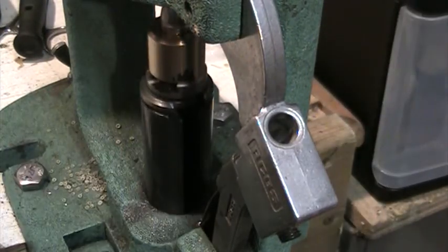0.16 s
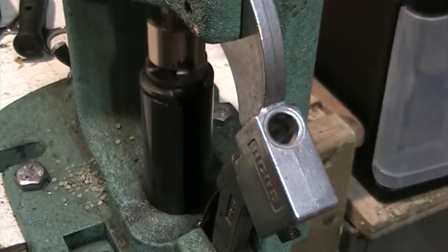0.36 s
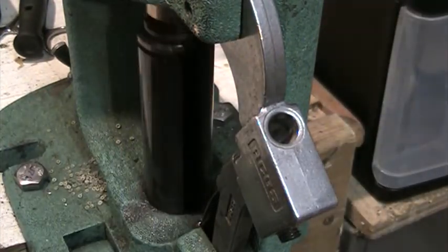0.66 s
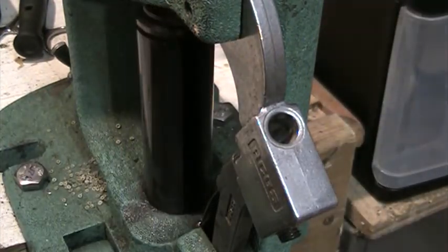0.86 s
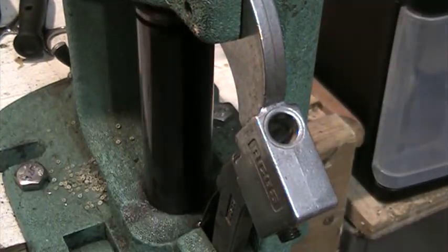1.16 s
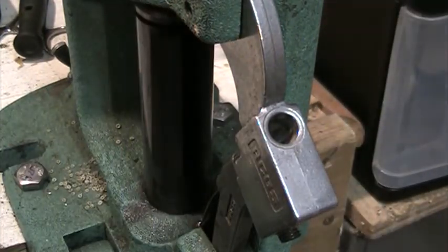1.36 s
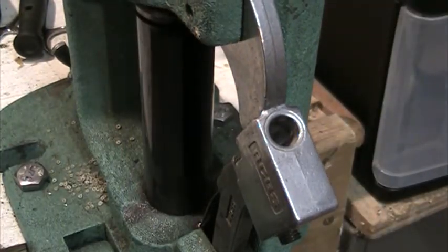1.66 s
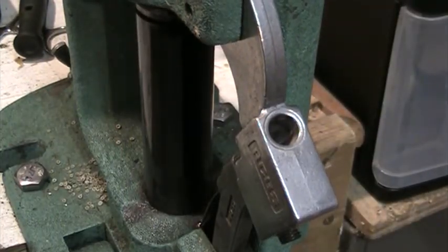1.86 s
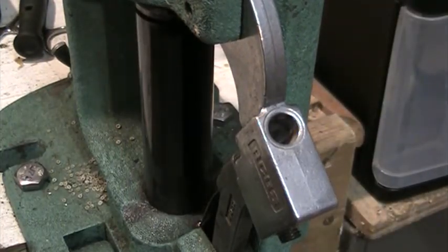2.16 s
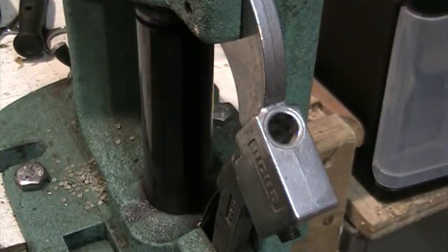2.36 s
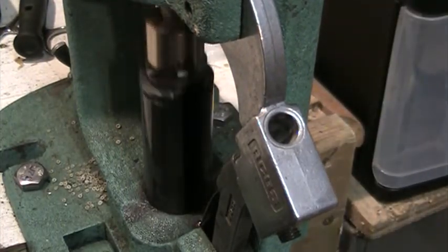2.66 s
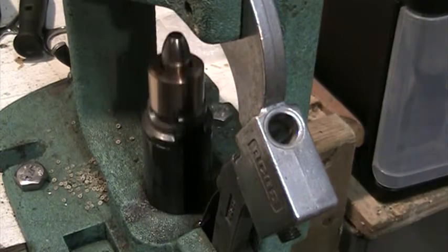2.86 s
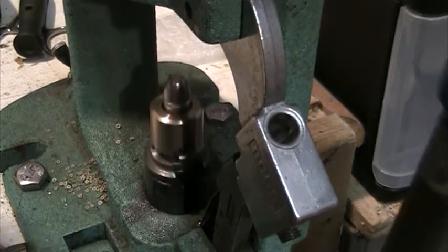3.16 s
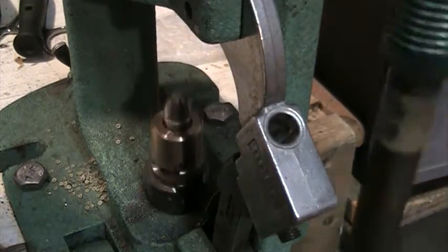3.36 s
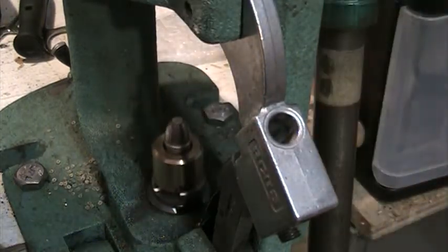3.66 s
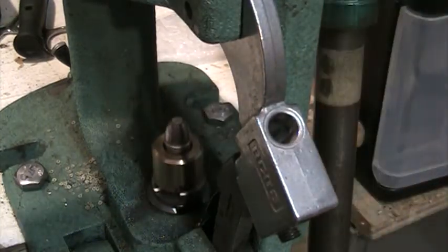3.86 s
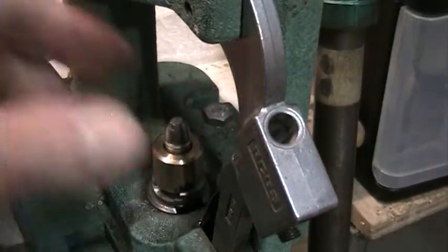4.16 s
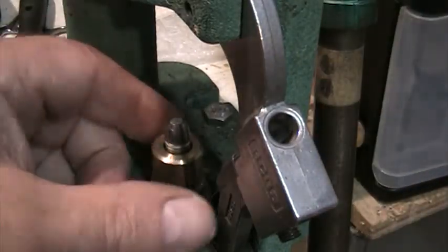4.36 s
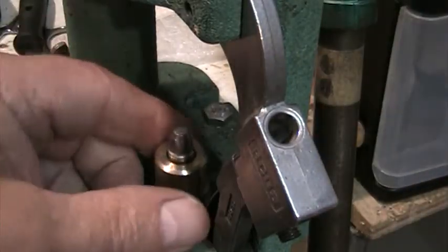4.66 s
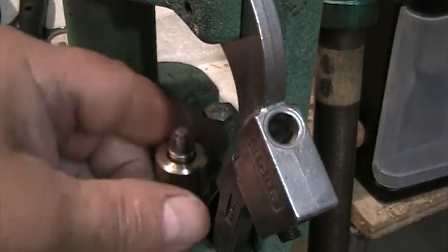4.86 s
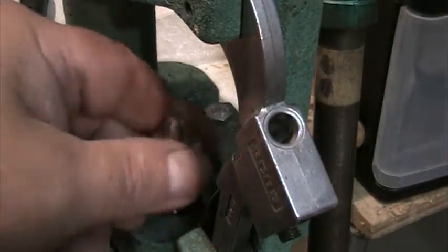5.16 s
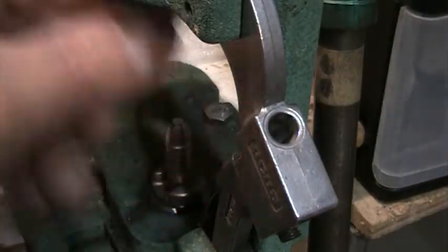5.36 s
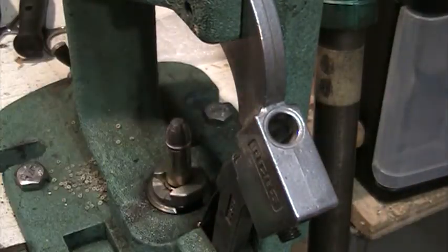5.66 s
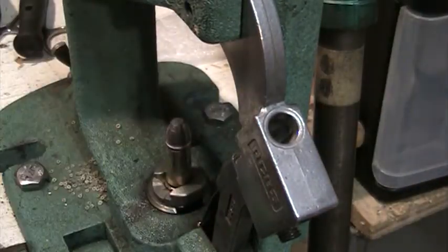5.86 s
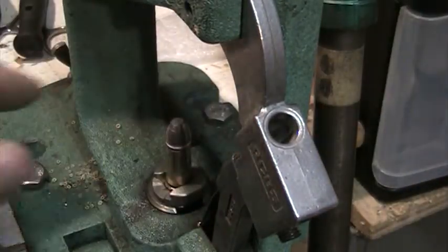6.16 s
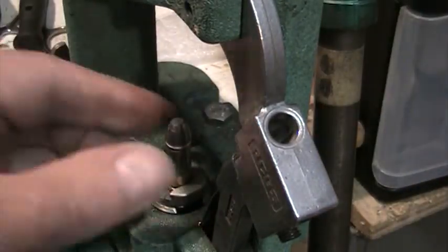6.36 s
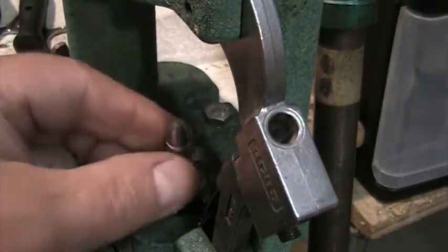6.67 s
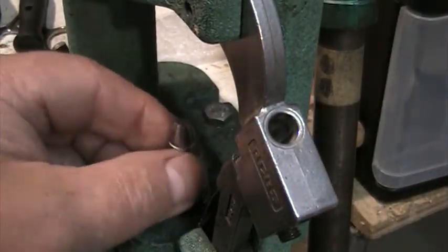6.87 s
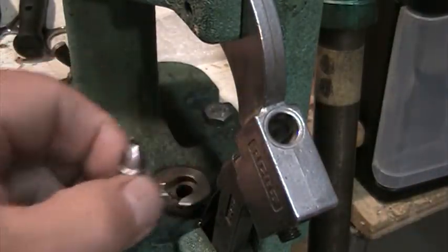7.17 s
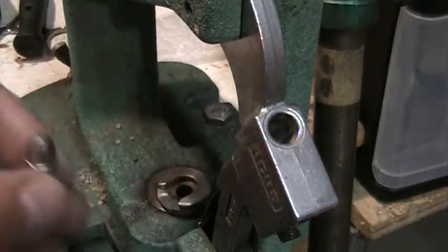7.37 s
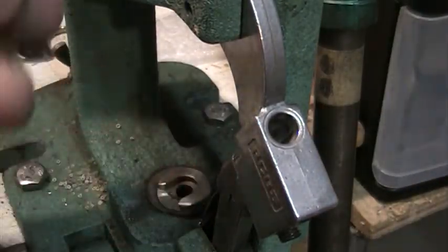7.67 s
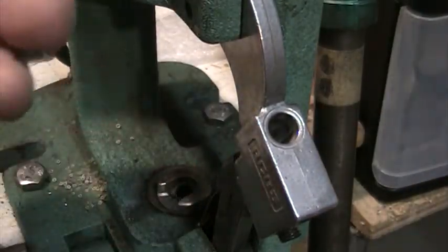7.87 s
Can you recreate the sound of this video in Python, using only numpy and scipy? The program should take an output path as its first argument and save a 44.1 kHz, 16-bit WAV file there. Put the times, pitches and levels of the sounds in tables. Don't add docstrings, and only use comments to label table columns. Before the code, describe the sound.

A close stereo pickup in a quiet small workshop: soft air hiss, low hum, and a faint rapid mechanical ticking from a camera lens motor throughout. A light rub fades by 0.3 s. Small clacks and soft knocks come at 0.8 and 1.0-1.2 s, then a loud, deep iron clunk at 1.8 s with a short scrape. From 2.27 to 2.45 s a bright, rattling burst of clacks breaks free, followed by smooth sliding. Duller knocks fall at 3.1 s, and a heavy double thud at 3.6 s shakes the bench. Between 4.4 and 5.4 s fingers work a steel die loose: crisp clicks, small scrapes, a sharp snap near 5.07. Clicks at 5.7-5.8 lead to clustered hollow knocks around 5.9-6.0 s as it settles in a tray. Light brass touches from 6.5 s end in a bright, short tink at 7.03 s, then a faint scrape and near quiet.

```python
import sys
import numpy as np
from scipy import signal
from scipy.fft import rfft, irfft, next_fast_len
from scipy.io import wavfile
from scipy.ndimage import map_coordinates

SR = 44100
rng = np.random.default_rng(int(sys.argv[2]) if len(sys.argv) > 2 else 0)


def int16_out(signal):
    q = np.round(np.clip(np.atleast_2d(signal).T, -1, 1) * 32767)
    wavfile.write(sys.argv[1], SR, q.astype(np.int16))


def level_to_linear(level):
    exponent = np.asarray(level, float) / 20
    return 10 ** exponent


N = 352800


def unit(x):
    return x / np.sqrt(np.mean(x ** 2) + 1e-20)


def peaked(x):
    return x / np.abs(x).max()


def along(points, hz):
    f, v = np.transpose(points)
    return np.interp(np.log(hz + 1), np.log(f + 1), v)


def filtered(x, response):
    m = next_fast_len(N + SR // 2)
    return irfft(rfft(x, m) * response(np.fft.rfftfreq(m, 1 / SR)), m)[..., :N]


def resonated(x, hz, q):
    return signal.lfilter(*signal.iirpeak(hz, q, SR), x)


def rush(spectrum, alike, source):
    def mid_side_response(hz):
        turn = np.arccos(np.clip(along(alike, hz), -1, 1)) / 2
        return level_to_linear(along(spectrum, hz)) * [np.cos(turn), np.sin(turn)]

    mid, side = filtered(source, mid_side_response)
    return unit(np.array([mid + side, mid - side]))


def add(track, s, sound, pan_db=0):
    part = track[:, round(s * SR):][:, :sound.shape[-1]]
    part += level_to_linear([[pan_db / 2], [-pan_db / 2]]) * sound[..., :part.shape[1]]


def ring(modes, t, scatter_db, attack_s):
    hz, db, t60 = np.transpose(modes)[:, :, None]
    strength, detune = rng.standard_normal((2, len(modes), 1))
    decay = level_to_linear(db + scatter_db * strength - 60 * t / t60)
    waves = decay * np.sin(2 * np.pi * hz * (1 + 0.016 * detune) * t)
    return peaked(waves.sum(0) * (1 - np.exp(-t / attack_s)))


def struck(modes, t, contact_t60, gritty):
    drive = gritty * level_to_linear(-60 * t[:900] / contact_t60) * rng.standard_normal(900)
    drive[0] = 1
    return peaked(signal.fftconvolve(ring(modes, t, 3.9, 0.0011), drive)[:len(t)])


def contacts(rows, body, click_t60, click_db, edge_db, body_db, dense_db, pan_db):
    out, t = np.zeros((2, N)), np.arange(SR // 9) / SR
    heavy_hz, heavy_db, lighter_db_per_octave, sharp_loss = 2700, 2, 4.6, 0.18
    dense = signal.butter(2, [600, 2600], "band", fs=SR)
    for s, db, sharpness_db, hz in rows:
        sharp_db = db + sharpness_db
        ring_db = db + heavy_db - lighter_db_per_octave * np.log2(hz / heavy_hz) - sharp_loss * sharpness_db

        rattle = level_to_linear([[-20], [-30], [-26], [-12]] - 60 * t / 0.15)
        burst = (level_to_linear(-60 * t / click_t60) + rattle) * rng.standard_normal((4, len(t)))
        burst[:, 0] += 3

        top_hz = max(8027 + 200 * min(sharpness_db, 0), 3800)
        dull = signal.butter(2, [2300, top_hz], "band", fs=SR)
        air = signal.butter(2, min(1.84 * top_hz, 16000), fs=SR)
        crack = level_to_linear(db + click_db) * peaked(signal.lfilter(*air, signal.lfilter(*dull, burst[0])))

        edge_hz = np.clip(max(1.1 * hz, 10501 + 420 * sharpness_db), 9500, 17000)
        sharp = signal.butter(2, [7000, edge_hz], "band", fs=SR)
        edge = level_to_linear(sharp_db + edge_db) * peaked(signal.lfilter(*sharp, burst[1:3]))
        small_part_db = (db if hz < 7000 else sharp_db) - 0.5
        small_part = level_to_linear(small_part_db) * peaked(resonated(burst[2], hz, 14))

        hardness_db = np.clip(db - ring_db, -20, 8)
        modes = [(f, mode_db + 0.39 * hardness_db * np.log2(f / 1300), t60) for f, mode_db, t60 in body]
        body_sound = struck(modes, t, 0.03, 0.07)
        body_sound += level_to_linear(dense_db) * peaked(signal.lfilter(*dense, burst[3]))

        add(out, s, crack + level_to_linear(ring_db + body_db) * body_sound, pan_db)
        add(out, s, edge[0] + small_part, pan_db if hz < 5000 else -2)
        add(out, s, 0.51 * edge[1] * [[1], [-1]])
    return out


def press():
    # start in seconds, strength in dB, sharpness in dB, pitch of the striking part in Hz.
    rise = [(0.7944, -45.5, -22, 2650), (0.8038, -47.5, -5, 2600), (1.0111, -34, -2, 3500),
            (1.0702, -51, -25, 2800), (1.1206, -32, -8, 2540), (1.1539, -36, -6, 3450),
            (1.778, -41, -3, 3500), (1.7865, -20, -17, 2260), (1.8068, -40, -2, 2680),
            (1.8215, -44, 6, 11500), (1.8427, -37, -11, 2720), (1.8509, -46, -2, 3520),
            (1.8893, -45.5, -13, 4770)]
    release = [(2.0217, -47.5, -17, 5700), (2.2275, -56, 10, 5940), (2.2687, -47, -16, 2880),
               (2.281, -35, -7, 7600), (2.2881, -20, -2, 2630), (2.3101, -36, -4, 2570),
               (2.3457, -31, 0, 5200), (2.35, -22, 3, 15600), (2.3553, -16.5, -7, 11800),
               (2.3971, -26.5, 4, 8300), (2.422, -28, 3, 7100), (2.4283, -23.5, 2, 7000),
               (2.4398, -31, 4, 3000), (2.4504, -26.5, -1, 11000), (2.5373, -49, -87, 3060)]
    fall = [(3.0807, -49, 2, 3020), (3.0873, -48, -15, 3370), (3.1038, -51, -27, 2670),
            (3.1208, -40, -17, 1350), (3.152, -49, -22, 3600), (3.5026, -46, -11, 2680),
            (3.51, -43.5, -19, 2620), (3.525, -50, -30, 2710), (3.5789, -43, -28, 2610),
            (3.588, -24.5, -16, 3300), (3.5958, -31, -0.5, 3240), (3.6167, -32, -6, 2490),
            (3.6248, -43, 4.5, 11300), (3.8957, -55.5, -40, 2950)]
    # frequency in Hz, level in dB, t60 in seconds.
    frame = [(1073, 5.5, 0.0044), (1176, -11.5, 0.033), (1460, -1.5, 0.0067), (1558, -8.5, 0.024),
             (1960, 9.5, 0.005), (2196, -7, 0.023), (2630, -4.5, 0.014), (3230, -5.5, 0.018)]
    out = np.zeros((2, N))
    for rows, click_t60 in [(rise, 0.021), (release, 0.011), (fall, 0.021)]:
        out += contacts(rows, frame, click_t60, click_db=2.5, edge_db=0.5, body_db=0, dense_db=-2, pan_db=3)
    return out


def guide():
    # frequency in Hz, sharpness as Q, level in dB.
    resonances = [(512, 20, -65.5), (1200, 13, -68), (1460, 11, -64)]
    end_s = 0.33
    fade = np.clip(1 - (np.arange(N) / SR / end_s) ** 3, 0, 1)
    return fade * sum(level_to_linear(db) * unit(resonated(rng.standard_normal(N), hz, q)) for hz, q, db in resonances)


def thuds():
    # start in seconds, peak in dB, main frequency in Hz, bench share in dB.
    beats = [(1.02, -44, 500, -0.5), (1.206, -42, 203, -3), (1.474, -46, 322, -8), (1.7745, -28.5, 715, 3),
             (1.788, -12, 290, -3), (1.82, -44, 245, 1), (1.84, -28, 250, -2.5), (2.236, -45, 200, 11),
             (2.279, -25, 584, -5), (2.284, -19, 165, -27), (2.293, -21.5, 180, -1), (2.35, -31.5, 298, 2),
             (2.418, -35, 189, 2), (2.547, -36, 172, -27), (2.76, -43, 192, -9), (3.073, -41.5, 129, 15),
             (3.1204, -26, 640, 2.5), (3.1211, -31.5, 1370, 1), (3.148, -26, 150, -24),
             (3.176, -43, 264, -13), (3.511, -41, 437, -10), (3.583, -22, 364, -4), (3.59, -18.5, 429, -2),
             (3.601, -26.5, 152, -2.5), (3.616, -26, 390, 1), (3.621, -19, 497, -32),
             (3.629, -25, 513, -30)]
    # start in seconds, peak in dB, main frequency in Hz.
    seats = [(1.121, -42, 465), (4.447, -38.5, 533), (4.582, -32, 530), (4.732, -28.5, 524),
             (5.071, -46, 500), (5.093, -31, 530), (5.2, -45.5, 523), (5.408, -44, 410),
             (6.506, -45.5, 526), (6.656, -46, 550), (6.864, -51, 330), (7.027, -47, 720)]
    # frequency in Hz, level in dB, t60 in seconds.
    base = [(290, 8.5, 0.024), (419.7, 5, 0.042), (499, 9, 0.041), (640, 9, 0.031)]
    bench = [(52, -13.5, 0.43), (129, -0.5, 0.16), (172, 10.5, 0.062), (290, -20.5, 0.91)]
    # frequency in Hz, density in dB per Hz.
    boom = [(18, -42), (42, -4), (285, 2), (388, -4), (1040, -13.5), (4000, -52), (5200, -64), (8800, -120)]
    out, shocks, t = np.zeros((2, N)), np.zeros(N), np.arange(SR // 4) / SR
    small = signal.butter(2, 150, "high", fs=SR)
    blows = list(beats)
    rock_s, rock_db, seat_deep_db = 0.016, -3.5, -18
    for s, db, hz in seats:
        blows += [(s, db, hz, seat_deep_db), (s + rock_s, db + rock_db, hz, seat_deep_db)]
    for s, db, hz, deep_db in blows:
        modes = [(f, mode_db - 9 * abs(np.log2(f / hz)), t60) for f, mode_db, t60 in base]
        modes.append((hz, 5, 0.04))
        knock = level_to_linear(db + 1.5) * signal.lfilter(*small, struck(modes, t, 0.013, 0.18))
        deep = level_to_linear(db + deep_db - 6.5) * ring(bench, t, 2.75, 0.0066)
        add(out, s, knock + deep, 0.8)
        shocks[round(s * SR)] = level_to_linear(2 * (db + deep_db - 19.5))
    fade_t = np.arange(SR) / SR
    fade = level_to_linear(-2 * 60 * fade_t / 0.93) * (1 - np.exp(-fade_t / 0.0036))
    shaking = np.sqrt(np.abs(signal.fftconvolve(shocks, fade)[:N]))
    return out + shaking * rush(boom, [(350, 1), (3000, 0.93)], rng.standard_normal((2, N)))


def steel_die():
    # start in seconds, strength in dB, sharpness in dB, pitch of the striking part in Hz.
    touches = [(4.4141, -45.5, -1, 14200), (4.4431, -39, 18, 3150), (4.4942, -43, 4, 7200),
               (4.54, -35.5, 9, 15300), (4.5823, -38, 16, 2650), (4.5921, -44.5, -3, 3420),
               (4.6384, -49, -14, 3450), (4.6685, -38.5, -2.5, 6940), (4.7317, -29, 15, 2640),
               (4.7601, -40, 2, 3570), (4.7798, -50.5, -39, 3340), (5.0442, -50, 5, 8000),
               (5.0673, -29.5, 5, 8430), (5.0893, -44, -21, 2700), (5.0935, -54, -25, 990),
               (5.1646, -38, 7, 5630), (5.2275, -50, -3, 3100), (5.2116, -46, 1, 3750),
               (5.2162, -42, -6, 3200), (5.3788, -44.5, 5, 3480), (5.4072, -46, -1, 3600),
               (5.4205, -49, 17, 3550), (5.6824, -30.5, -1, 6700), (5.6845, -43, -25, 1320),
               (5.7829, -35.5, -2, 6840)]
    # frequency in Hz, level in dB, t60 in seconds.
    collar = [(680, -7.5, 0.06), (957, -9, 0.1), (1098, 8, 0.03), (1448, 1.5, 0.076), (2050, 0, 0.044),
              (3200, 2.5, 0.035)]
    return contacts(touches, collar, click_t60=0.0085, click_db=8, edge_db=-8, body_db=0, dense_db=3, pan_db=2.5)


def tray():
    # start in seconds, strength in dB, sharpness in dB, pitch of the striking part in Hz.
    touches = [
        (5.9215, -39.5, -47, 2550),
        (5.9294, -38.5, -67, 2400),
        (5.9605, -33.5, -45, 2600),
        (5.9635, -28, -25, 2700),
        (5.991, -25, -31, 2500),
        (6.012, -45, -21, 2800),
    ]
    # start in seconds, peak in dB.
    flat_knocks = [(5.685, -37.5), (5.787, -39.5), (5.928, -29), (5.965, -31.5), (5.993, -33),
                   (6.014, -34.5)]
    # frequency in Hz, level in dB, t60 in seconds.
    shelf = [(759, -18, 0.16), (1015, -17, 0.19), (1307, -2.5, 0.11), (1353, 6, 0.06), (1423, -11, 0.093),
             (1510, -10, 0.056), (1795, 9, 0.024), (2010, 7.5, 0.026), (2320, -10, 0.017),
             (3150, 8, 0.0097), (3350, -8, 0.02)]
    hollow_floor = [(357, 4, 0.04)]
    out = contacts(touches, shelf, click_t60=0.021, click_db=3, edge_db=-5, body_db=2.5, dense_db=-4, pan_db=3)
    for s, db in flat_knocks:
        add(out, s, level_to_linear(db) * ring(hollow_floor, np.arange(SR // 8) / SR, 0, 0.0024), 2.5)
    return out


def brass_case():
    # start in seconds, strength in dB, sharpness in dB, pitch of the striking part in Hz.
    touches = [(6.5001, -35.5, 0.5, 7950), (6.5051, -32.5, 2, 3160), (6.5596, -41, -3, 6000),
               (6.6488, -35.5, -1, 12200), (6.654, -30.5, -2.5, 6100), (6.692, -47, 4.5, 7440),
               (6.745, -48.5, -17, 3220), (6.7791, -55, -45, 4360), (6.9201, -54.5, -15, 2860),
               (6.9635, -52.5, -34, 2960), (7.0264, -21, -11, 6440), (6.6416, -44, -9, 2940),
               (7.0715, -39, -7, 5830)]
    # frequency in Hz, level in dB, t60 in seconds.
    brass = [(1067, 1, 0.025), (1480, 1, 0.02), (1951, 1, 0.05), (2800, 7, 0.019), (3300, 10.5, 0.014)]
    chime = [(5600, -17, 0.024), (6150, 2, 0.011), (6500, -25, 0.0525), (7670, 2, 0.0074),
             (8300, -23, 0.012)]
    out = contacts(touches, brass, click_t60=0.0094, click_db=2, edge_db=5.5, body_db=-2, dense_db=0, pan_db=2.5)
    s, db = max(touches, key=lambda row: row[1])[:2]
    add(out, s, level_to_linear(db + 11.5) * ring(chime, np.arange(SR // 8) / SR, 0.74, 0.00027), 0.3)
    return out


def singing_parts():
    # start in seconds, peak in dB,
    # frequency in Hz, t60 in seconds.
    part_notes = [(0.7958, -43.5, 2450, .04), (0.803, -41, 2720, 0.035), (0.913, -47.5, 3050, .025),
                  (1.012, -29.5, 2590, 0.025), (1.069, -48, 2500, .03), (1.136, -48, 900, 0.028),
                  (1.845, -40, 1200, 0.042), (1.891, -40.5, 1500, .04), (1.904, -45, 1100, .03),
                  (2.443, -32, 2300, 0.018), (3.091, -43, 2450, 0.032), (3.105, -42, 2500, 0.04),
                  (4.416, -49, 1450, .05), (4.432, -46, 2800, .015), (4.443, -34.5, 1040, .02),
                  (4.456, -51, 1460, .08), (4.583, -42, 786, .03), (4.636, -52, 1460, .08),
                  (4.732, -28, 826, 0.015), (4.734, -46, 2660, 0.018), (4.746, -47, 3150, .05),
                  (5.151, -48, 2500, .02), (5.178, -48, 2220, 0.06), (5.214, -39, 1050, .025),
                  (5.682, -30.5, 1300, 0.02), (5.695, -50.5, 974, 0.4), (5.783, -37, 1200, .03),
                  (5.79, -54, 944, 0.11), (5.862, -52, 1100, .03), (6.552, -45, 1430, 0.035),
                  (6.552, -49, 2190, .03), (6.594, -51, 1450, .03), (6.642, -38.5, 1470, 0.046),
                  (6.748, -49, 1450, .03), (6.779, -45.5, 1440, 0.035), (6.921, -43.5, 1430, 0.023),
                  (6.964, -45, 2120, 0.04), (7.032, -37, 1960, 0.089), (7.034, -46, 1440, 0.12)]
    more_part_notes = [(1.787, -18.5, 784, .02), (1.8, -24, 330, 0.02), (1.906, -51, 2870, .03),
                       (2.3556, -25, 2250, .018), (2.4, -33, 2310, 0.035), (2.452, -38, 2550, .03),
                       (3.1205, -37, 3930, .01), (3.152, -40, 1340, .04), (3.174, -48, 2450, .02),
                       (3.1, -36.5, 646, 0.062), (3.618, -30, 920, 0.015), (5.0915, -32, 540, 0.05),
                       (5.682, -39, 7100, 0.025), (5.685, -41, 3450, 0.027), (5.684, -51, 15400, .05),
                       (5.783, -33, 6980, 0.016), (5.785, -54, 15300, .04), (5.96, -28, 1840, .02),
                       (5.961, -28, 2920, .02), (5.991, -26, 2050, 0.038), (5.995, -29, 2420, .04),
                       (6.011, -23.5, 1400, 0.037), (6.027, -37, 1410, .05), (6.027, -35, 356, 0.035),
                       (6.015, -39, 703, 0.053), (5.935, -34, 1000, 0.044), (6.015, -43, 1000, 0.048),
                       (3.5105, -31.5, 2620, .03), (3.512, -38, 3260, .02), (3.579, -30, 650, 0.035),
                       (3.6185, -13, 180, 0.018), (3.631, -23.5, 480, 0.022), (3.591, -22, 1157, .02),
                       (5.0905, -28.5, 950, .012), (5.205, -46, 1480, .06), (5.071, -49, 1980, .05),
                       (3.13, -32, 400, .03), (2.357, -41, 11900, .05)]
    out, t = np.zeros((2, N)), np.arange(SR // 8) / SR
    for s, db, hz, t60 in list(part_notes) + list(more_part_notes):
        drive = 0.13 * level_to_linear(-60 * t[:600] / 0.015) * rng.standard_normal(600)
        drive[0] = 1
        mode = level_to_linear(-60 * t / t60) * np.sin(2 * np.pi * hz * t) * (1 - np.exp(-t / 0.00048))
        tone = signal.fftconvolve(mode, drive)[:len(t)]
        grit = resonated(np.pad(drive[1:], (0, len(t) - len(drive) + 1)), hz, 3)
        add(out, s, level_to_linear(db) * (peaked(tone) + 0.22 * peaked(grit)), 2.2)
    return out


def ticks():
    # start in seconds, peak in dB, frequency in Hz, t60 in seconds.
    tick_rows = [(1.613, -48, 11500, .004), (1.792, -27, 11100, 0.011), (1.797, -38, 13500, .01),
                 (1.834, -46, 10000, .005), (1.85, -46, 11500, .005), (1.8755, -47, 11500, .004),
                 (1.97, -48, 3200, .006), (2.075, -51, 4600, .005), (2.154, -54, 11000, .004),
                 (2.3497, -24, 8200, .004), (2.429, -23, 8450, 0.0034), (2.44, -30, 10500, .01),
                 (2.445, -34, 8500, .006), (4.574, -44, 3800, .014), (5.0495, -40, 8000, .006),
                 (5.051, -42, 13500, .006), (5.0585, -44, 7000, .005), (5.0605, -44, 14500, .005),
                 (5.0668, -18, 8440, 0.0044), (5.103, -51, 10600, .005), (5.172, -38, 7900, .005),
                 (5.173, -45, 13500, .005), (5.223, -48, 7000, .006), (5.2755, -61, 8000, .006),
                 (7.009, -51, 8000, .005), (5.0668, -25, 15300, .005), (2.4279, -28, 15300, .004),
                 (2.451, -28, 15000, .006), (5.783, -31.5, 10000, .005), (1.1205, -46, 15300, .006),
                 (1.011, -46, 12300, .006), (0.795, -53, 12800, .005), (7.0256, -24, 9600, .012),
                 (7.0258, -31, 12200, .01), (4.493, -36, 7500, 0.0054), (4.5394, -29, 8300, 0.004)]
    out, t = np.zeros((2, N)), np.arange(SR // 40) / SR
    for s, db, hz, t60 in tick_rows:
        grit = level_to_linear(-60 * t / t60) * (1 - np.exp(-t / 0.00094)) * rng.standard_normal((2, len(t)))
        both, apart = resonated(resonated(grit, hz, 5.6), hz, 5.6)
        tick = (both + hz / 20000 * apart * [[1], [-1]]) / np.abs(both).max()
        add(out, s, level_to_linear(db) * tick, -2 * np.sign(10800 - hz))
    return out


def slides():
    # start in seconds, end in seconds, hiss in dB, drag in dB.
    rubs = [(0.004, 0.36, -70.5, -61.5), (0.68, 0.962, -82, -60), (1.1, 1.235, -85, -62),
            (1.773, 1.939, -58, -47.5), (2.172, 2.32, -62.5, -76), (2.266, 2.473, -56, -47),
            (2.538, 3.124, -62.5, -79), (3.067, 3.214, -66.5, -63), (3.306, 3.575, -74, -63.5),
            (3.575, 3.687, -57.5, -46.5), (4.421, 4.518, -70, -54.5), (4.567, 4.668, -78, -55.5),
            (4.866, 4.91, -59, -63), (4.977, 4.988, -60, -79), (5.044, 5.089, -51, -54),
            (5.148, 5.255, -61, -50.5), (5.365, 5.446, -58, -56.5), (5.833, 5.994, -64, -57),
            (6.54, 6.714, -80, -63), (6.998, 7.185, -64.5, -77), (7.235, 7.357, -61.5, -83),
            (7.65, 8.105, -97, -66.5), (3.865, 4.104, -65.5, -62.5), (7.02, 7.078, -52, -57)]
    # frequency in Hz, density in dB per Hz.
    scrape = [(1200, -52), (2500, 4), (4000, 3), (8000, 3.5), (14600, -12.5), (16500, -40)]
    drag = [(250, 1.5), (600, 6), (1200, -3), (1490, 3), (1750, -0.5), (2100, -5.5), (3000, -5.5),
            (6000, -50)]
    clumps = level_to_linear(1.7 * map_coordinates(rng.standard_normal(N // 400 + 4), [np.arange(N) / 400]))
    grains = (rng.random(N) < 600 / SR) * level_to_linear(5.7 * rng.random(N) + 7)
    raw = clumps * (1 + grains) * rng.standard_normal((2, N))
    strokes = np.zeros((2, N))
    for start_s, end_s, *layers_db in rubs:
        swell = np.hanning(round((end_s - start_s) * SR)) ** 0.11
        add(strokes, start_s, level_to_linear(layers_db)[:, None] * swell)
    hiss = strokes[0] * rush(scrape, [(5000, 0.45)], raw)
    return hiss + strokes[1] * rush(drag, [(1000, 0.91)], raw)


def lens_motor():
    # start in seconds, 3 kHz level in dB, 2 kHz level in dB.
    motor_ticks = [
        (.4360, -54, -78),
        (0.4415, -55, -59.5),
        (0.469, -54.5, -65.5),
        (0.5023, -53, -65),
        (0.5353, -52.5, -62),
    ]
    period_s = 9 / 59.94
    out, t = np.zeros((2, N)), np.arange(SR // 30) / SR
    for turn in range(-3, 52):
        for s, high_db, low_db in motor_ticks:
            shell = [(2955, high_db, 0.018), (2025, low_db, 0.049), (4400, high_db - 10, 0.012)]
            tick = ring(shell, t, 5, 0.00062)
            add(out, max(s + turn * period_s, 0), level_to_linear(max(high_db, low_db) + 1) * tick)
    return out


def workshop():
    # frequency in Hz, density in dB per Hz.
    air = [(59, -34), (100, -3), (310, -3.5), (900, -8.5), (1610, -11), (4030, -16), (15100, -31),
           (16500, -57)]
    hum_spectrum = [(25, -40), (36, 2), (47, 8.5), (60, -1.5), (85, -14), (110, -51)]
    # time in seconds, air level in dB.
    air_levels = [(0.4, -70.5), (1.88, -68), (8.0, -72)]
    # frequency in Hz, left-right likeness from -1 to 1.
    alike = [(60, -0.46), (180, -0.45), (550, -0.62), (1650, -0.56), (4970, -0.51), (15000, -0.073)]
    swell = level_to_linear(np.interp(np.arange(N) / SR, *np.transpose(air_levels)))
    hum = level_to_linear(-66.5) * rush(hum_spectrum, alike, rng.standard_normal((2, N)))
    return level_to_linear(16) * swell * rush(air, alike, rng.standard_normal((2, N))) + hum


def walls():
    # frequency in Hz, t60 in seconds.
    room_decay = [(200, 0.29), (2000, 0.15), (10000, 0.016)]
    hz, t, z = signal.stft(rng.standard_normal((2, SR // 2)), SR, nperseg=256)
    z = z * [np.ones_like(hz[:, None]), (hz / (hz + 300))[:, None]]
    z = z * level_to_linear(-60 * t / along(room_decay, hz)[:, None])
    both, apart = signal.istft(z, SR, nperseg=256)[1]
    return np.array([both + 0.5 * apart, both - 0.5 * apart]) / np.linalg.norm(both)


def scene():
    near = press() + thuds() + steel_die() + tray() + brass_case() + singing_parts() + ticks()
    delayed = np.pad(near.mean(0), (120, 0))[None]
    echo = level_to_linear(-15) * signal.fftconvolve(delayed, walls(), axes=1)[:, :N]
    return near + echo + guide() + slides() + lens_motor() + workshop()


def roll_off(x):
    return signal.sosfilt(signal.butter(12, 16960, fs=SR, output="sos"), x)


def record(dry):
    def microphone(hz):
        return hz ** 4 / (hz ** 4 + 33 ** 4) / (1 + (hz / 15700) ** 40)

    return roll_off(filtered(dry, microphone))


dry = scene()
out = record(dry)
int16_out(out)
```